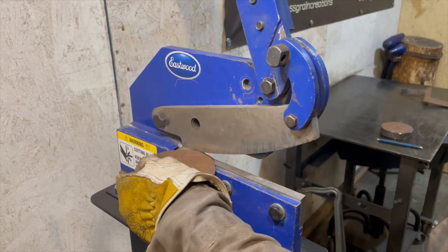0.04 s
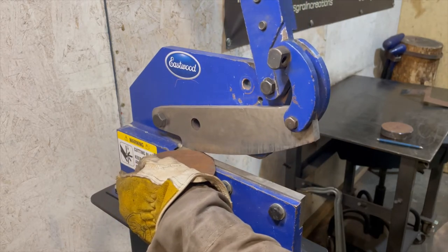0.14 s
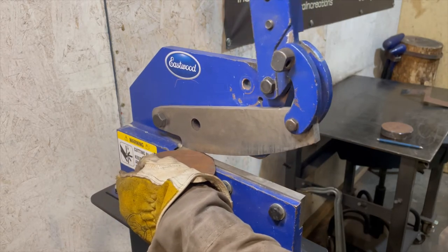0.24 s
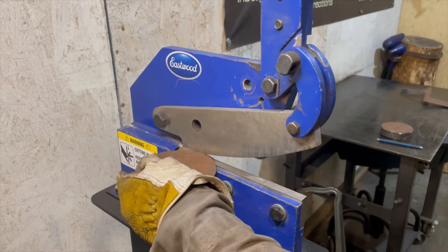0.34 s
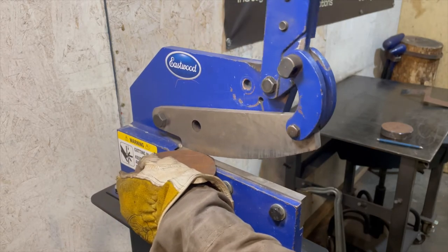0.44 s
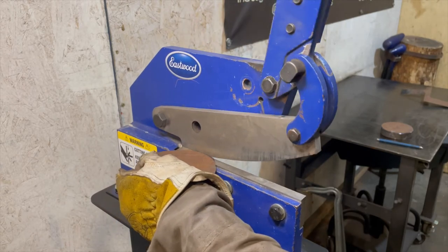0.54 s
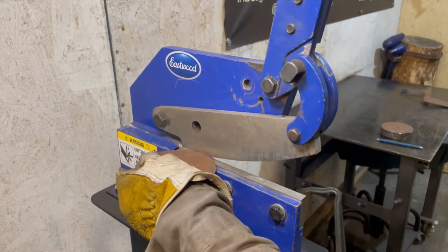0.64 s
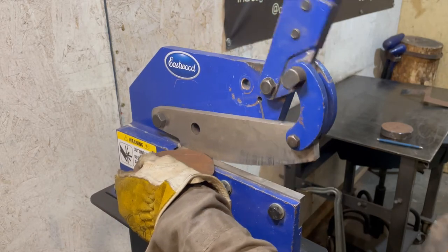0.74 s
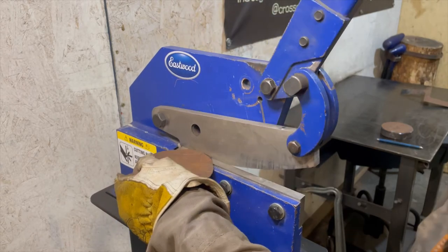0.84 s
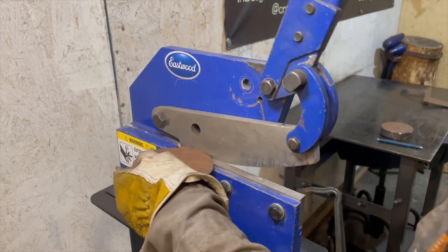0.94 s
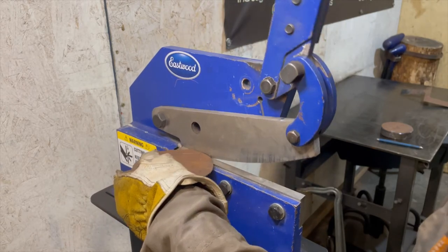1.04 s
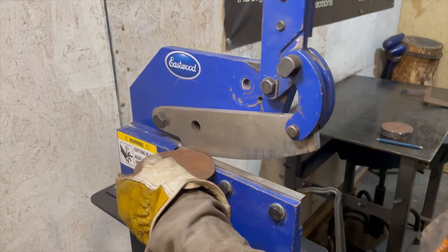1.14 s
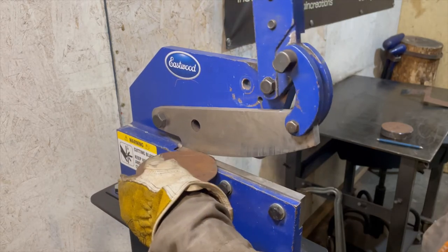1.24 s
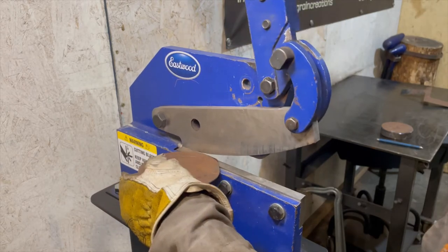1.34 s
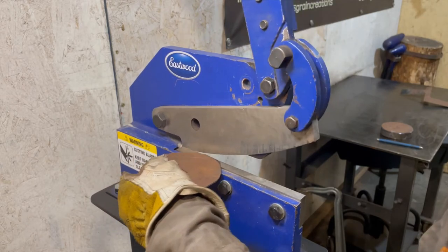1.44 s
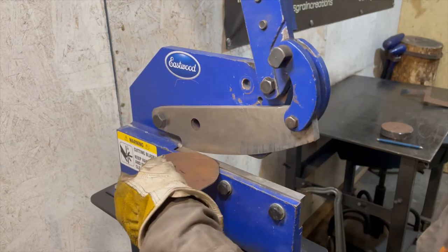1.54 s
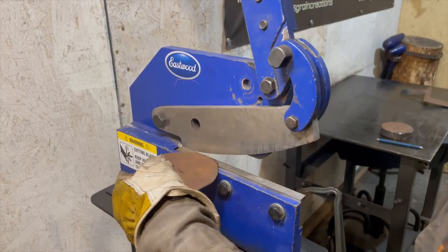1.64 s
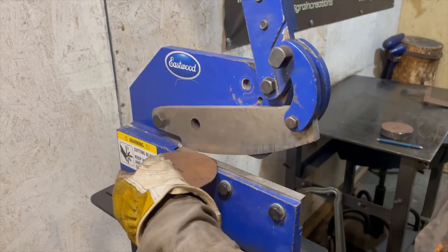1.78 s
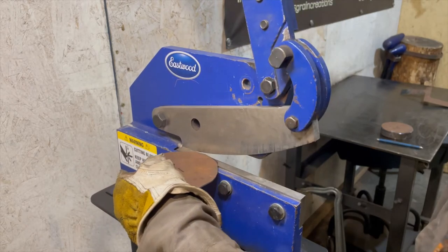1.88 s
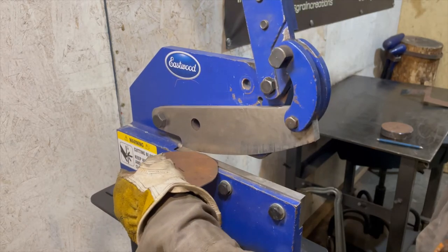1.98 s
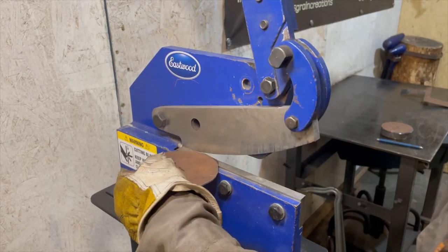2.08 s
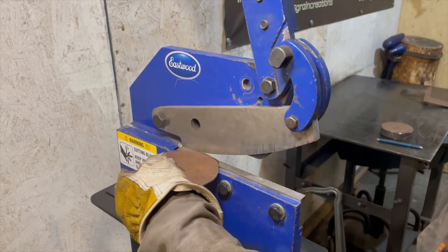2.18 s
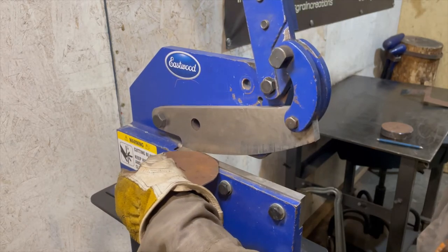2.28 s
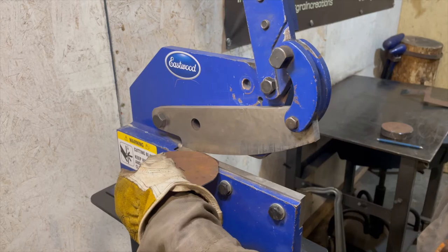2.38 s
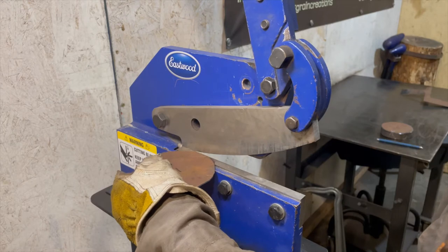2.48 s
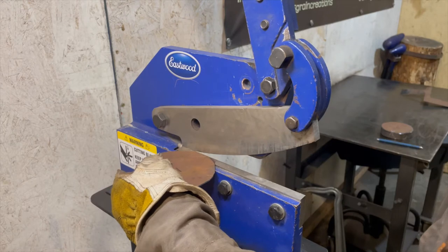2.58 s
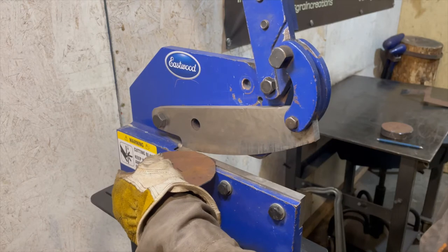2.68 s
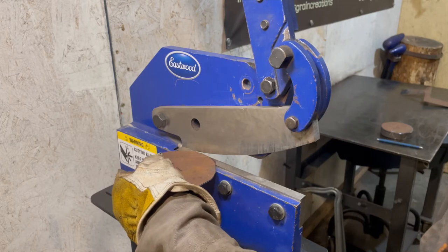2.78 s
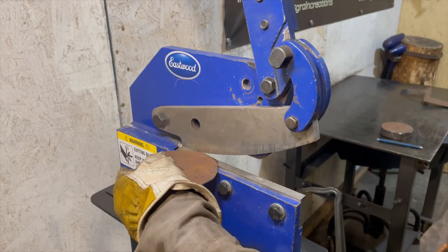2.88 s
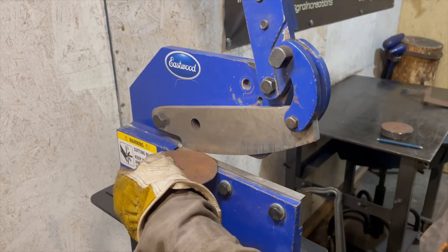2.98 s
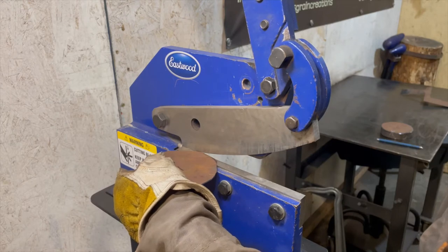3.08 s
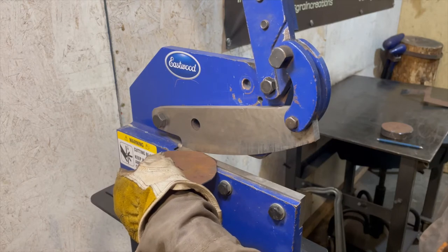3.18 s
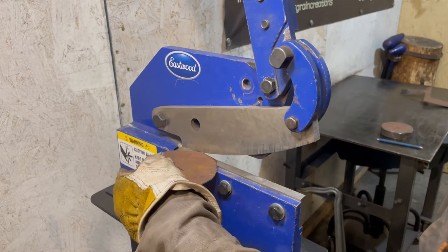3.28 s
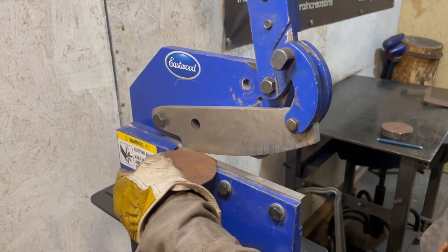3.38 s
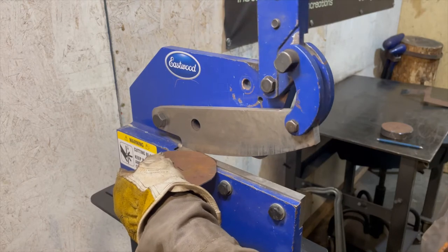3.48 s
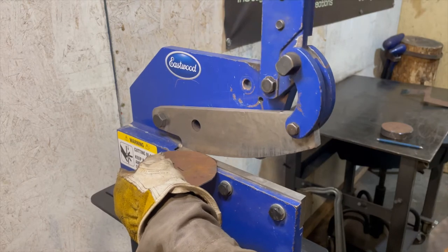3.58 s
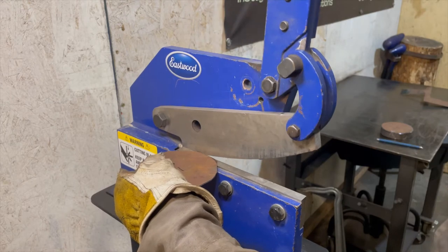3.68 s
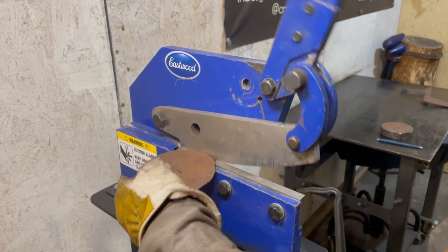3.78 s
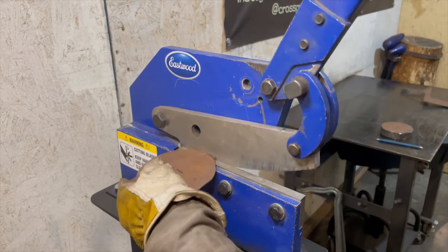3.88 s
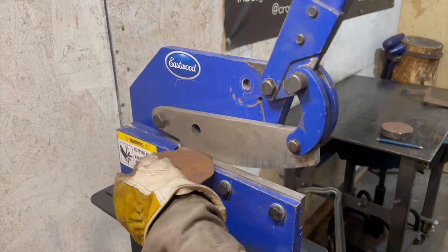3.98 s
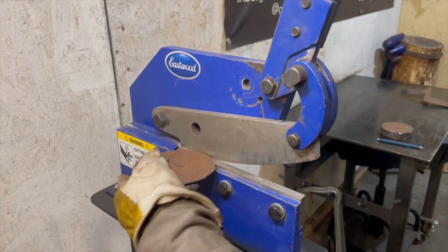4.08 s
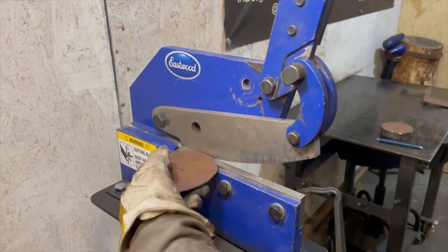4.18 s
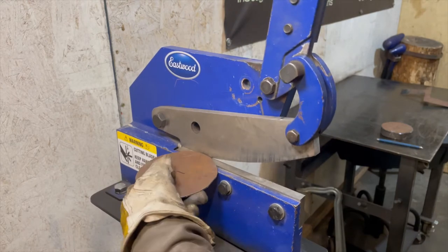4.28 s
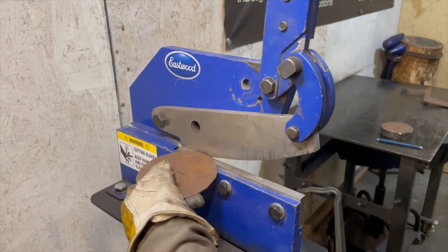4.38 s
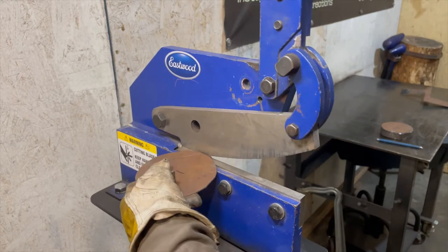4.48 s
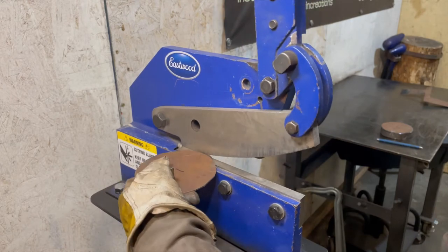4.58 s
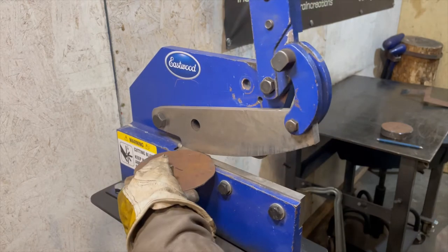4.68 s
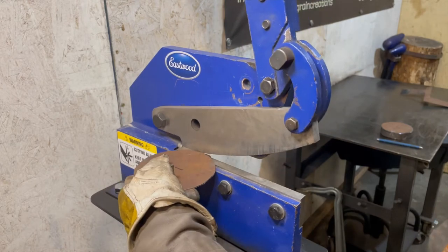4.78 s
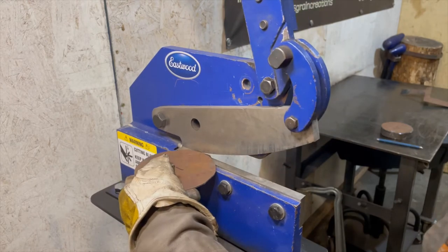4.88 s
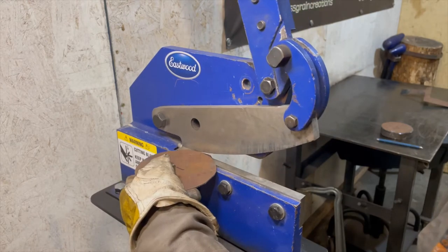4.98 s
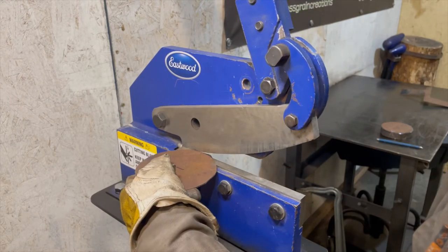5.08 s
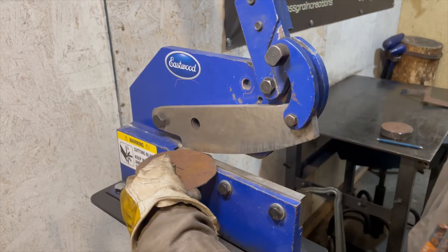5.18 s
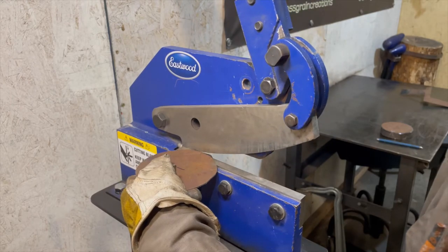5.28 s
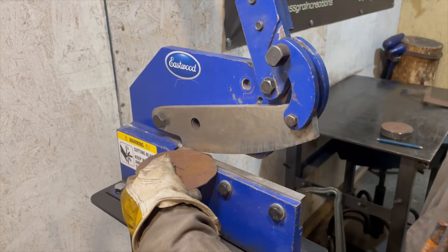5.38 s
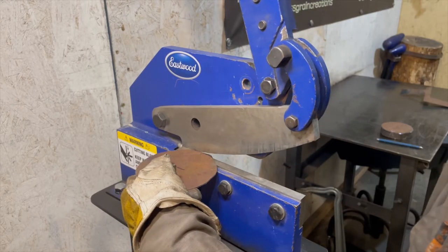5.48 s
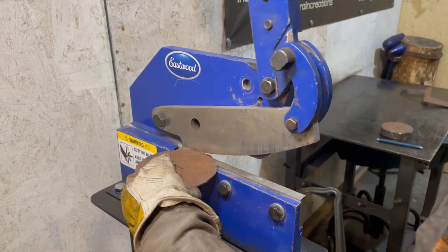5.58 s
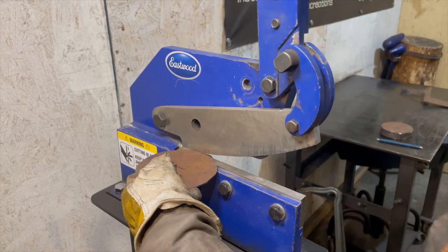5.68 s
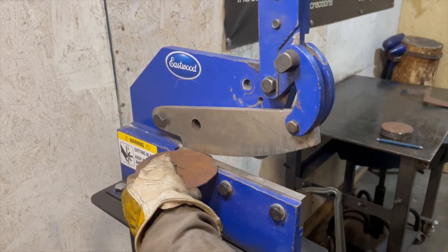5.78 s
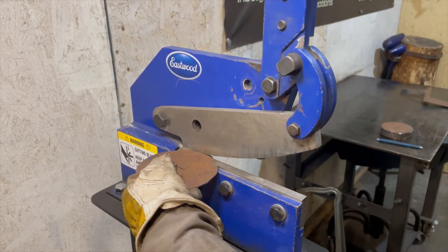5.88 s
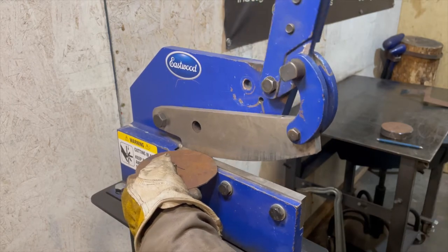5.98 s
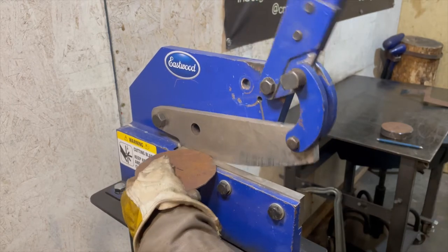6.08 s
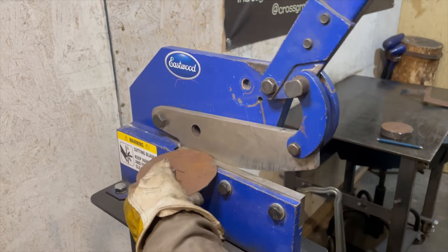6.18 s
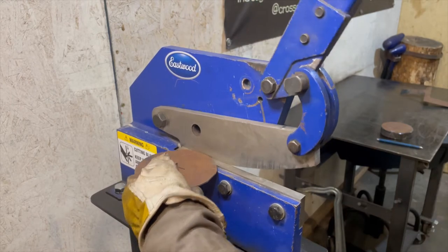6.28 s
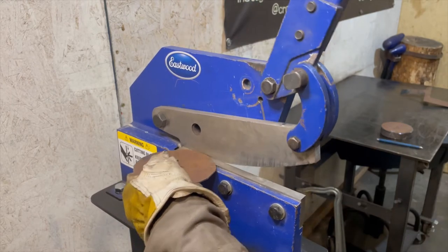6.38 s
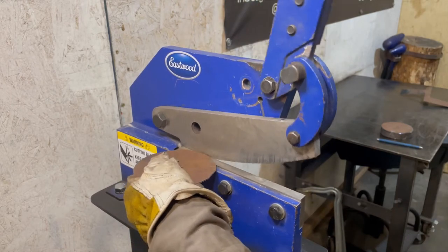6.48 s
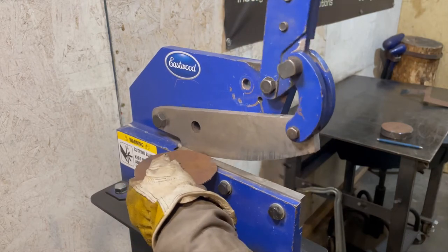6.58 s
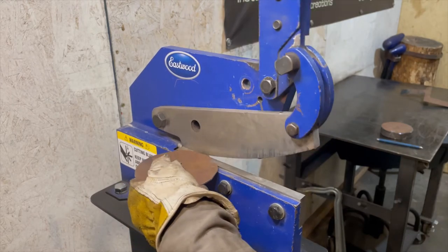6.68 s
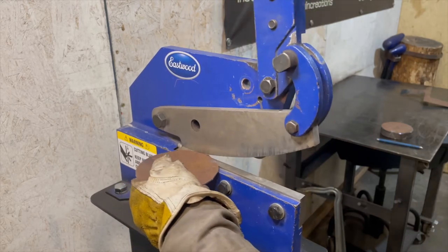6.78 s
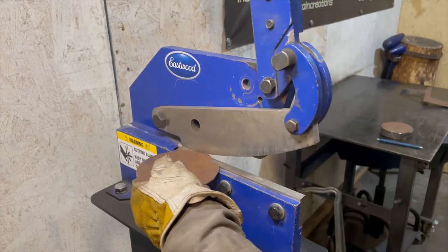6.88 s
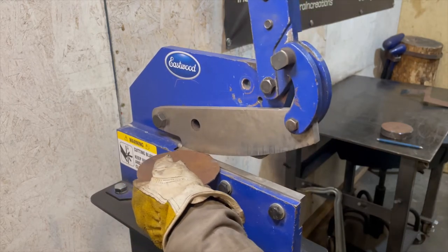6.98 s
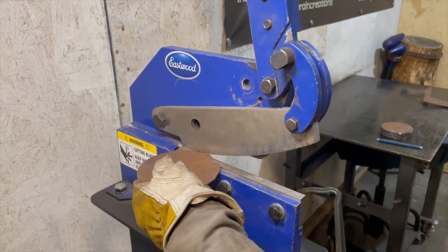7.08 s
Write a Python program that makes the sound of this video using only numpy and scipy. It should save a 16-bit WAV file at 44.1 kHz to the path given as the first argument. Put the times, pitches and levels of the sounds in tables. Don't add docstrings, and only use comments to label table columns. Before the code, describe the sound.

Three sharp steel bangs from a hand-worked metal cutter in a workshop, with pivot creaks, disc clinks and small knocks over faint fan rumble.

```python
import sys
import numpy as np
from scipy import signal
from scipy.fft import rfft, irfft, next_fast_len
from scipy.io import wavfile
from scipy.ndimage import uniform_filter1d, minimum_filter1d, map_coordinates

SR = 44100
rng = np.random.default_rng(int(sys.argv[2]) if len(sys.argv) > 2 else 0)


def attenuation_scalar(level_db):
    decades = np.asarray(level_db, float) / 20
    return 10 ** decades


def persist_wave(psi):
    counts = np.round(np.clip(psi, -1, 1) * 32767).astype(np.int16)
    wavfile.write(sys.argv[1], SR, np.atleast_2d(counts).T)


N = 314874


def unit(x):
    return x / np.sqrt(np.mean(x ** 2) + 1e-20)


def along(points, hz):
    f, v = np.transpose(points)
    return np.interp(np.log(hz + 1), np.log(f + 1), v)


def spectrum(points):
    return lambda f: attenuation_scalar(along(points, f))


def wobble(rate):
    knots = rng.standard_normal(int(N * rate / SR) + 4)
    return map_coordinates(knots, [np.arange(N) * rate / SR])


def filtered(x, response):
    m = next_fast_len(len(x) + 8192)
    return irfft(rfft(x, m) * response(np.fft.rfftfreq(m, 1 / SR)), m)[:len(x)]


def resonant(peaks):
    def response(f):
        total = 0
        for k, (centre, width, db) in enumerate(peaks):
            damping = 1j * f * width
            total = total + (-1) ** k * attenuation_scalar(db) * damping / (centre * centre - f * f + damping)
        return total
    return response


def grit(rough_db, rate):
    return unit(attenuation_scalar(rough_db * wobble(rate)) * rng.standard_normal(N))


def heave(s, db, rise, fall):
    t = np.arange(N, dtype=np.float32) / np.float32(SR) - np.float32(s)
    slopes = np.float32(np.log(1000)) / np.abs(np.float32([rise, fall]))
    return np.float32(attenuation_scalar(db)) * np.exp(np.minimum(t * slopes[0], -t * slopes[1]))


# (frequency [Hz], t60 [s])
SHOP = [(100, 0.17), (400, 0.75), (1500, 0.45), (5000, 0.46), (12000, 0.44)]


def shop(x):
    hz, t, z = signal.stft(rng.standard_normal(min(len(x), SR)), SR, nperseg=256)
    decay = attenuation_scalar(-60 * t / along(SHOP, hz)[:, None])
    tail = signal.istft(z * decay, SR, nperseg=256)[1]
    late = np.pad(tail / np.linalg.norm(tail), (200, 0))
    return signal.fftconvolve(x, late)[:len(x)]


def struck(blows, hz, level, t60, colour, room_db, rise, crack_s, damping, size, shorter=0):
    out, t = np.zeros(N + size), np.arange(size, dtype=np.float32) / SR
    hz, level, t60 = np.array([hz, level, t60], np.float32)[:, :, None]
    knots = np.arange(0, size + 1024, 512)
    blend = np.maximum(0, 1 - np.abs(np.arange(size) - knots[:, None]) / 512).astype(np.float32)
    lead = 128
    decay = attenuation_scalar(-60 * damping * t / t60).astype(np.float32)
    loose = (.6 * np.sqrt(hz / 2000 * np.minimum(2, .3 / t60))).astype(np.float32)
    ring_swell = 1 - np.exp(-t / 0.0034)
    contact = 1 + 1.445 * attenuation_scalar(-60 * t / 0.36)
    onset = np.clip((np.arange(size) - lead) / 24 + 1, 0, 1)
    ending = np.minimum(1, 3 * (1 - t / t[-1])) ** 2
    hardest_db = max(blow[1] for blow in blows)
    for s, db, ring_db, treble_db in blows:
        slope = lambda f: treble_db / 2 * np.log2((f + 50) / 2000)
        scatter = 1.5 * rng.standard_normal(hz.shape)
        fade = attenuation_scalar(level + scatter + slope(hz)).astype(np.float32) * decay
        steps = rng.standard_normal((len(hz), len(knots)), np.float32)
        wander = (loose * np.cumsum(steps, axis=1)) @ blend
        ring = np.sum(fade * np.sin(np.float32(2 * np.pi) * hz * t + wander), axis=0)
        ring = np.pad(ring * ring_swell * contact, (lead, 0))[:size]
        crack_t60 = abs(crack_s) * attenuation_scalar(shorter * (db - hardest_db))
        burst = rng.standard_normal(size) * attenuation_scalar(-60 * t / crack_t60) * (1 - np.exp(-t / rise))
        crack = filtered(np.pad(burst, (lead, 0))[:size], lambda f: colour(f) * attenuation_scalar(slope(f)))
        crack = crack * onset
        dry = attenuation_scalar(db - 3.5) * (crack / np.abs(crack).max() + attenuation_scalar(ring_db - 7.0) * ring)
        out[round(s * SR) - lead:][:size] += (dry + attenuation_scalar(room_db) * shop(dry)) * ending
    return out[:N]


# (frequency [Hz], density [dB per Hz])
AIR = [(12, -32.5), (20, 11.5), (33, 4.5), (49, -22.5), (70, -11), (241, -17), (377, -19), (527, -28),
       (574, -27), (1190, -26), (1290, -28.5), (2820, -37.5), (3340, -36.5), (4940, -39.5), (16000, -64)]
# (frequency [Hz], width [Hz], level [dB])
WHINE = (530, 13, -74.5)


def air():
    hz, width, whine_db = WHINE
    whine = attenuation_scalar(whine_db) * unit(filtered(rng.standard_normal(N), resonant([(hz, width, 0)])))
    fan = unit(filtered(rng.standard_normal(N), spectrum(AIR)))
    return attenuation_scalar(-58 + wobble(3.7)) * fan + whine


# (time of the top [s], level [dB], t60 [s])
SWAY = [(0.27, -47.5, 0.88), (0.44, -68, 0.58), (0.69, -43, 1.2), (1.04, -54, 2.3), (3.48, -51.5, 1.2),
        (3.72, -39.5, 0.75), (3.92, -51.5, 1.8), (4.14, -47, .8), (4.43, -54, 0.34), (5.66, -46.5, 1.3),
        (6.03, -39.5, 0.74), (6.24, -41.5, 0.54), (6.62, -60, 1)]


def bench():
    rise_s, rest_db = 0.15, -72
    power = sum(heave(s, db, rise_s, t60) ** 2 for s, db, t60 in SWAY)
    legs = resonant([(63, 30, 0)])
    note = unit(filtered(rng.standard_normal(N), lambda f: legs(f) ** 2))
    return np.sqrt(attenuation_scalar(rest_db) ** 2 + power) * note


# (frequency [Hz], density [dB per Hz])
HALL = [(150, -18), (700, 1), (3000, -5), (6000, -4.5), (10000, -30.5)]


def hall(x, t60, level_db):
    t = np.arange(2 * SR) / SR
    tail = filtered(rng.standard_normal(len(t)), spectrum(HALL))
    tail = tail * attenuation_scalar(-60 * t / t60) * (1 - np.exp(-t / 0.0044))
    blurred = x * unit(wobble(600))
    return attenuation_scalar(level_db) * signal.fftconvolve(blurred, tail / np.linalg.norm(tail))[:N]


# (frequency [Hz], width [Hz], level [dB])
HELD = [(380, 53, 2.5), (830, 410, 3), (1064, 330, 6), (1636, 250, 1), (2060, 380, 1), (3320, 330, 0.3),
        (4490, 430, 1), (6400, 930, -5), (7200, 410, -3), (10030, 5900, -15.5)]


def gripped(f):
    return resonant(HELD)(f) ** 2


# (time [s], level [dB], length [s], bass [dB])
SCRAPE = [(2.955, -69, 0.045, 3), (1.182, -57, .03, -11), (1.345, -55, 0.09, 3), (1.395, -58, 0.078, 1),
          (1.645, -62.5, 0.075, 1.5), (1.783, -62.5, 0.072, 6.5), (2.004, -54, 0.05506, 0.5),
          (2.09, -69, 0.023, 1), (2.318, -58, 0.1, -1.5), (2.365, -52.5, 0.023, 4),
          (2.512, -63, 0.091, 3.5), (2.75, -57.5, 0.076, 1)]


def disc_scrapes():
    rub = unit(filtered(grit(2.5, rate=300), gripped))
    bass = filtered(rub, lambda f: 1 / (1 + (f / 1400) ** 6))
    t, slide = np.arange(N) / SR, np.zeros(N)
    for s, db, length, bass_db in SCRAPE:
        stroke = np.sin(np.pi * np.clip((t - s) / length, 0, 1)) ** 2.0
        slide += attenuation_scalar(db) * stroke * (rub + (attenuation_scalar(bass_db) - 1) * bass)
    return slide


# (time [s], level [dB])
NUDGES = [
    (1.812, -53.5),
    (1.83, -61),
    (2.558, -56.5),
]
# (frequency [Hz], width [Hz], level [dB])
RIM = [(809, 60, 1), (1594, 77, -3.5)]


def disc_nudges():
    bumps = sum(heave(s, db, rise=.03, fall=0.12) for s, db in NUDGES)
    return bumps * unit(filtered(rng.standard_normal(N), lambda f: resonant(RIM)(f) ** 2))


DISC_HZ = [1060, 2492, 3250, 4245, 4350, 4640, 4705, 4840, 5740, 6395, 6460, 6611, 7200, 7671, 8975, 10070,
           10680, 11680, 13400, 14600]
# (t60 [s], firm grip [dB], loose grip [dB])
DISC = [(.17, 2.5, -0.5), (0.15, -8.5, -1.5), (0.045, -34, -40), (0.25, -13.5, -18), (0.15, -19, -3.5),
        (0.065, -1, 0), (0.18, -3, -22.5), (0.1, -11, -16), (0.27, -17, -16), (0.31, -13, -9),
        (0.081, -4.5, -4), (.2, -15, -18), (0.25, -17, -20), (0.18, -24, -23.5), (0.085, -18, -29),
        (0.182, -30, -27), (0.15, -32, -27), (0.14, -39, -33), (.12, -33, -35), (0.13, -37, -39)]
DISC_T60, FIRM_DB, LOOSE_DB = np.transpose(DISC)
# (time [s], peak [dB], treble [dB])
TICKS = [(2.369, -41, 1), (2.3975, -24.5, 0.5), (2.555, -46, -2.5), (2.802, -37, -1), (6.332, -26.5, -7.5),
         (6.3711, -25, -2), (6.6487, -47, -3.5), (6.664, -55, 4), (6.706, -40, -15), (6.7898, -48, -0.5)]


def disc_ticks():
    blows = [(s, db, -30, treble_db) for s, db, treble_db in TICKS]
    return struck(blows, DISC_HZ, FIRM_DB, DISC_T60, gripped, room_db=-8.5, rise=0.0003,
                  crack_s=0.012, damping=4, size=SR // 5)


# (time [s], peak [dB], ring [dB], treble [dB])
CLINKS = [
    (0.9873, -21.5, -7, -0.5),
    (1.0735, -17.5, -6.5, 1),
]
# (time [s], peak [dB], ring [dB], treble [dB])
LOOSE = [
    (3.9736, -16.5, -14.5, -1),
    (4.1608, -22.5, -6, -3),
    (4.1742, -14, -8.5, 6),
    (4.2936, -26, -15, 2.5),
]


def disc_clinks():
    firm = struck(CLINKS, DISC_HZ, FIRM_DB, DISC_T60, gripped, room_db=-5.5, rise=0.000611,
                  crack_s=0.0178, damping=1.84, size=SR // 2)
    loose = struck(LOOSE, DISC_HZ, LOOSE_DB, DISC_T60, gripped, room_db=-6.5, rise=0.0006,
                   crack_s=.022, damping=0.96, size=SR // 2)
    return firm + loose


def disc():
    slide = disc_scrapes() + disc_nudges()
    return disc_clinks() + disc_ticks() + slide + attenuation_scalar(-14.0) * shop(slide)


SLIP_RISE_S = 0.022
# (frequency [Hz], t60 [s], level [dB])
HANDLE = [(771, 2.2, -22.5), (1253, 1.37, 0), (1330, 1.3, -14)]
HANDLE_DB = [
    -54.5,
    -30,
    -35,
    -32,
    -28.5,
    -51,
]


def handle():
    starts = [HEAVES[0][1][0], PULL_ONE[1][0], PULL_TWO[1][0], PULL_THREE[1][0], REBOUNDS[0][0], KNOCKS[-3][0]]
    t, out = np.arange(N) / SR, np.zeros(N)
    for hz, t60, db in HANDLE:
        power = sum(heave(s, jolt_db, SLIP_RISE_S, t60) ** 2 for s, jolt_db in zip(starts, HANDLE_DB))
        out += attenuation_scalar(db) * np.sqrt(power) * np.sin(2 * np.pi * hz * t + 0.98 * wobble(12))
    return out


# (frequency [Hz], width [Hz])
GROAN = (490, 29)
# (time of the top [s], level [dB], rise [s], fall [s])
GROANS = [
    (.5, -60, .3, .5),
    (2.06, -60.5, .05, 0.52),
    (2.57, -61.5, 0.044, 0.43),
    (5.91, -49.5, .15, 0.54),
]


def frame_groan():
    note = unit(filtered(rng.standard_normal(N), resonant([(*GROAN, 0)])))
    return sum(heave(*stroke) for stroke in GROANS) * note


# (frequency [Hz], width [Hz], level [dB])
SQUEAL = [(1775, 50, -3), (2250, 50, -3.5), (2620, 30, -3), (3070, 51, 0), (3530, 33, 0), (4360, 40, -12.5),
          (4900, 90, -12.5), (5560, 60, -19)]
# (time of the top [s], level [dB], 60 dB rise [s], 60 dB fall [s])
SQUEALS = [(.16, -57, -0.05, 0.4), (.23, -57, 0.26, .4), (.41, -56, .35, 0.73), (0.669, -52, 0.18, -0.5),
           (3.38, -57, 0.02, .5), (3.615, -59, 0.3, 1.2), (5.55, -50, 0.12, .5), (5.85, -60, 0.2, .9),
           (5.91, -57.5, 0.17, -0.2)]


def blade_squeal():
    song = unit(filtered(grit(1.5, rate=60), resonant(SQUEAL)))
    return sum(heave(*stroke) for stroke in SQUEALS) * song


# (frequency [Hz], width [Hz], level [dB])
PIVOT = [(129.4, 7.6, -5), (210, 18, 1.5), (343.3, 19, 7), (530, 19, -4), (805, 45, -1), (1080, 26, -1),
         (1240, 6, -3)]
# (frequency [Hz], density [dB per Hz])
RASP = [(1200, -3.5), (1900, 0.5), (2800, 0), (3600, -3.5), (5000, -6.5), (6500, -13), (8500, -31.5),
        (16000, -45.5)]
# (time [s], force [dB], 60 dB fall [s], brightness [dB])
SLIPS = [
    [(0.085, -68, 0, -10), (0.153, -43.5, 0.37, -4.5), (0.214, -37, 0.28, -4.5)],
    [(3.368, -48, -0.14, -4.5), (3.398, -41.5, 0.58, -17.5), (3.613, -56, 4, -1.5)],
    [(5.5, -52, 0.9, -11.5), (5.85, -59, 2, -1.5), (5.9, -46, 1.5, -12), (6.712, -61.5, 0.7, -12),
     (6.8, -77.5, 8, 8.5)],
]
# (time of the top [s], force [dB], 60 dB rise [s], 60 dB fall [s], brightness [dB])
HEAVES = [
    [(0.3, -51.5, 0.96, 1.5, -11), (0.43, -50.5, 0.67, 0.1, -5.5), (0.668, -48.5, 0, 0.1, -3.5),
     (0.677, -30, 0.09, 0.66, -6.5)],
    [(3.46, -51, 0.46, 1, -21.5), (3.672, -50, -0.5, 1.5, -7.5)],
    [(5.545, -51.5, 0.05, 0.07, 2.5), (5.6, -50.5, 0.24, 1, -11)],
]


def pivot_drag():
    hum = unit(filtered(grit(2, rate=200), resonant(PIVOT)))
    rasp = unit(filtered(grit(1.5, rate=300), lambda f: spectrum(RASP)(f) * (f > 900)))
    rasp = rasp * attenuation_scalar(1.5 * wobble(30))
    strokes = [(s, db, SLIP_RISE_S, fall, bright_db) for s, db, fall, bright_db in sum(SLIPS, [])]
    strokes += sum(HEAVES, [])
    drag = np.zeros(N)
    for s, db, rise, fall, bright_db in strokes:
        drag += heave(s, db - 3.0, rise, fall) * (hum + attenuation_scalar(bright_db - 2.5) * rasp)
    return drag


def lever():
    return pivot_drag() + blade_squeal() + frame_groan()


FRAME_HZ = [133, 205, 326, 378, 575, 598, 803, 868, 1046, 1100, 1140, 1254, 1290, 1336]
# (t60 [s], first pull [dB], second pull [dB], third pull [dB], small knocks [dB])
FRAME = [(0.24, -19.5, -18.5, -18, -21), (0.14, -16.5, -17, -6, -11.5), (0.21, 8, -2.5, -3.5, -1.5),
         (0.19, -11, -5.5, -11.5, -12), (0.39, -13.5, -17, -18.5, -19.5), (0.085, -19.5, -3.5, -18, -23),
         (0.6, -7, -11, -7.5, -5.5), (0.85, -9.5, -10, -16.5, -7), (0.32, -7, -2.5, -8.5, -13.5),
         (0.36, 0, -2.5, -8, -15.5), (0.86, -9.5, -8, -11, -6), (1.3, -23, -24, -24, -10.5),
         (0.21, 2, -13.5, -19, -12.5), (1.2, -17, -25.5, -19.5, -21.5)]
BLADE_HZ = [1545, 1712, 1915, 2062, 2186, 2340, 2525, 2625, 2832, 3058, 3233, 3268, 3302, 3520, 3773, 4005,
            4441, 4829, 5560, 5922, 6874, 9500]
# (t60 [s], first pull [dB], second pull [dB], third pull [dB], small knocks [dB])
BLADE = [(0.35, -18.5, -13, -15.5, -18.5), (0.44, -13.5, -23.5, -16.5, -17.5),
         (0.47, -23.5, -12.5, -15.5, -15.5), (0.33, -18.5, -4.5, -14, -14), (0.45, -17, -17, -17, -15.5),
         (.5, -14, -22, -30, -13.5), (0.56, -13, -17.5, -19, -18.5), (0.66, -14, -19.5, -19.5, -16),
         (0.19, -27.5, -21, -19, -17.5), (0.37, -3, -21, -16, -20), (0.31, -21.5, -3, -13, -19.5),
         (0.33, -21.5, -7.5, -23, -16.5), (0.071, -24.5, -9, -11, -20.5), (0.15, -6, -13.5, -5, -19),
         (0.3, -22.5, -7, -12, -17.5), (0.1, -20.5, -17.5, -26, -22), (0.12, -18.5, -14.5, -14, -26),
         (.5, -23.5, -22.5, -23, -28), (0.46, -16, -28, -23.5, -30), (0.57, -25.5, -23.5, -26, -29.5),
         (0.08, -27, -16, -16, -34.5), (0.05, -29, -24.5, -10.5, -40)]
MODE_HZ = FRAME_HZ + BLADE_HZ
MODE_T60, FIRST_DB, SECOND_DB, THIRD_DB, SMALL_DB = np.transpose(FRAME + BLADE)
REBOUND_DB = [-19, -7, 1, -10, -19.5, -15, -6, -8.5, -13, -11, -10, -14, -12, -18, -20, -19, -15, -15.5,
              -11, -13, -19, -15.5, -15.5, -18, -17, -18.5, -16, -15, -17.5, -19, -26, -28, -30.5, -35, -35,
              -40]
# (time [s], peak [dB], treble [dB])
PINS = [(.158, -44, 8.5), (0.2124, -38, 8.5), (1.285, -37.5, 2), (3.337, -54, 6.5), (3.397, -48, 4),
        (4.717, -42.5, -4), (5.0429, -51, -5), (5.25, -51.5, -1.5), (5.31, -55.5, -2), (5.473, -48, 0),
        (5.5182, -44, -1), (5.533, -46, 7), (5.58, -44, 8), (6.6854, -41, -10), (6.7503, -45.5, -5)]
# (frequency [Hz], density [dB per Hz])
PIN = [(250, -38), (700, -7.5), (1100, 10), (1500, -5), (2100, 0.5), (2800, -7.5), (3600, -7), (5000, -13),
       (9000, -23.5), (16000, -40.5)]


def pin_clicks():
    blows = [(s, db, -25, treble_db) for s, db, treble_db in PINS]
    frame = len(FRAME)
    return struck(blows, FRAME_HZ, SMALL_DB[:frame], MODE_T60[:frame], spectrum(PIN), room_db=-5.5,
                  rise=.0003, crack_s=0.016, damping=4.5, size=SR // 6)


# (time [s], peak [dB], ring [dB], treble [dB])
SETTLES = [
    (4.3259, -24.5, -10, -1.5),
    (4.338, -30, -10, -0.5),
    (4.4345, -26, -13, 2),
    (6.2647, -23, -15.5, -2.5),
]


def link_settles():
    return struck(SETTLES, MODE_HZ, REBOUND_DB, MODE_T60, spectrum(PIN), room_db=-3.5, rise=0.00049,
                  crack_s=0.0387, damping=2.26, size=2 * SR // 5)


# (time [s], peak [dB], ring [dB], treble [dB])
KNOCKS = [(0.151, -38, -9.5, -4), (0.2115, -28, -11, -1.5), (1.004, -21, -11, 2.5), (1.013, -30.5, -9.5, 2),
          (2.049, -46.5, -11, -3.5), (3.346, -45.5, -10.5, -2.5), (3.366, -37.5, -13, -3.5),
          (3.395, -31, -10.5, -3), (3.615, -46, -11, -3), (3.647, -35, -12.5, -4),
          (5.495, -41, -10.5, -0.5), (5.533, -32.5, -6, 2.5), (5.571, -36, -9, -9), (5.897, -45, -5, -2)]
# (frequency [Hz], density [dB per Hz])
CRACK = [(59, -51.5), (100, -22.5), (302, -0.5), (502, -18.5), (752, -4.5), (1280, -3), (1610, -13.5),
         (3620, -16.5), (11900, -58), (16000, -71)]


def link_knocks():
    return struck(KNOCKS, MODE_HZ, SMALL_DB, MODE_T60, spectrum(CRACK), room_db=-2.0, rise=0.00058,
                  crack_s=.025, damping=1.4, size=SR // 3)


# (time [s], peak [dB], ring [dB], treble [dB])
SNAPS = [
    (3.676, -2, -24, -1),
    (5.991, -14, -26, -5),
]
# (frequency [Hz], density [dB per Hz])
SNAP = [(200, -35), (600, -13), (1000, -3.5), (1550, -0.5), (2000, -6.5), (2800, -15), (4500, -7),
        (7000, -12), (16000, -35)]


def blade_snaps():
    return struck(SNAPS, MODE_HZ, SECOND_DB, MODE_T60, spectrum(SNAP), room_db=-7.0, rise=.0002,
                  crack_s=.065, damping=1.6, size=SR // 2)


# (time [s], peak [dB], ring [dB], treble [dB])
PULL_ONE = [
    (0.678, -11, -15, -1.5),
    (0.685, -3, -9, 3.5),
    (0.694, -8.5, -9, 0),
]
PULL_TWO = [
    (3.694, -2, -13, 0.5),
    (3.702, -3, -12, 1.1),
    (3.723, -8, -15, -5),
]
PULL_THREE = [
    (6.005, -11.5, -13.5, -4),
    (6.011, -1, -16, 2),
    (6.026, -14, -17, -3),
]
# (time [s], peak [dB], ring [dB], treble [dB])
REBOUNDS = [
    (4.031, -10, -9, 2.5),
    (4.038, -13, -9, 3),
    (4.05, -17.5, -7.5, -2.5),
]
# (frequency [Hz], density [dB per Hz])
SLAM_ONE = [(59, -53.5), (100, -26.5), (322, -7), (492, -10), (1310, -7.5), (2800, -17), (3050, -13),
            (4200, -17.5), (5650, -18), (16000, -47)]
SLAM_TWO = [(59, -51.5), (100, -28.5), (343, -7.5), (558, -13.5), (854, -2.5), (2800, -9), (3320, -5),
            (5420, -11.5), (6990, -16), (16000, -41)]
SLAM_THREE = [(59, -40), (100, -15), (343, -7.5), (583, -11), (1060, 0.5), (2860, -9.5), (3700, -7.5),
              (6840, -12.5), (8830, -24), (16000, -29)]
# (crack t60 of the hardest blow [s], damping [factor])
HANDLING = [
    (0.049, 1.72),
    (0.067, 1.22),
    (0.084, 0.93),
    (0.026, 1.93),
]


def slams():
    blows = [PULL_ONE, PULL_TWO, PULL_THREE, REBOUNDS]
    levels = [FIRST_DB, SECOND_DB, THIRD_DB, REBOUND_DB]
    cracks = [SLAM_ONE, SLAM_TWO, SLAM_THREE, CRACK]
    out = np.zeros(N)
    for hits, mode_db, crack, (crack_s, damping) in zip(blows, levels, cracks, HANDLING):
        out += struck(hits, MODE_HZ, mode_db, MODE_T60, spectrum(crack), room_db=-6.0, rise=0.00019,
                      crack_s=crack_s, damping=damping, size=7 * SR // 10, shorter=0.78)
    return out


def shear():
    return pin_clicks() + link_settles() + link_knocks() + blade_snaps() + slams()


def scene():
    work = disc() + handle() + lever() + shear()
    return (air() + bench() + hall(work, t60=1.177, level_db=-22) + work)[None]


def top_cut(x):
    return signal.sosfilt(signal.butter(12, 16730, fs=SR, output="sos"), x)


def record(dry):
    need = np.minimum(1, .39 / (np.abs(dry) + 1e-9))
    gain = uniform_filter1d(minimum_filter1d(need, size=129), size=65)
    mix = filtered((dry * gain)[0], lambda f: 1 / (1 + (f / 16000) ** 60))[None]
    return top_cut(mix)


dry = scene()
out = record(dry)
persist_wave(out)
```